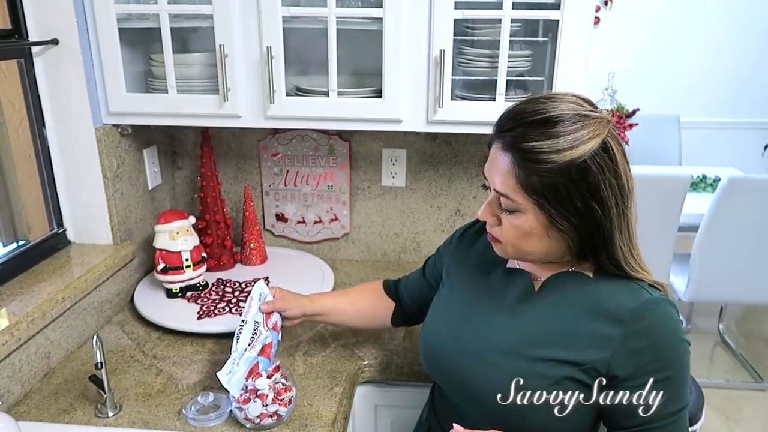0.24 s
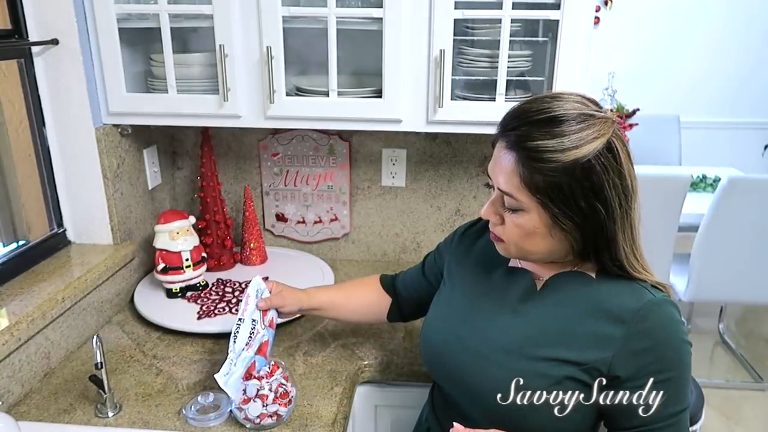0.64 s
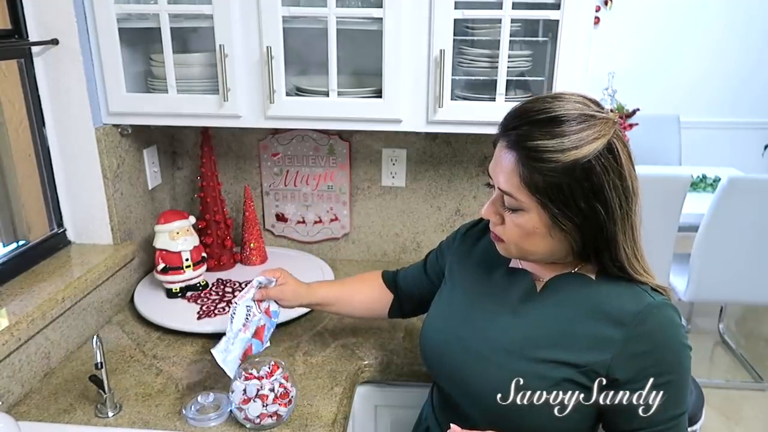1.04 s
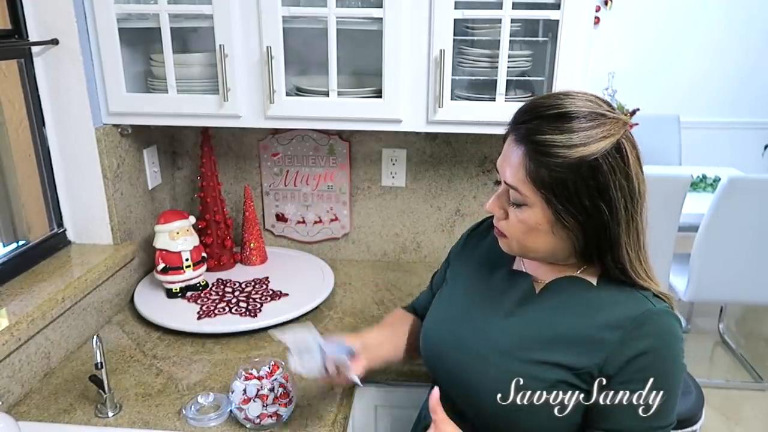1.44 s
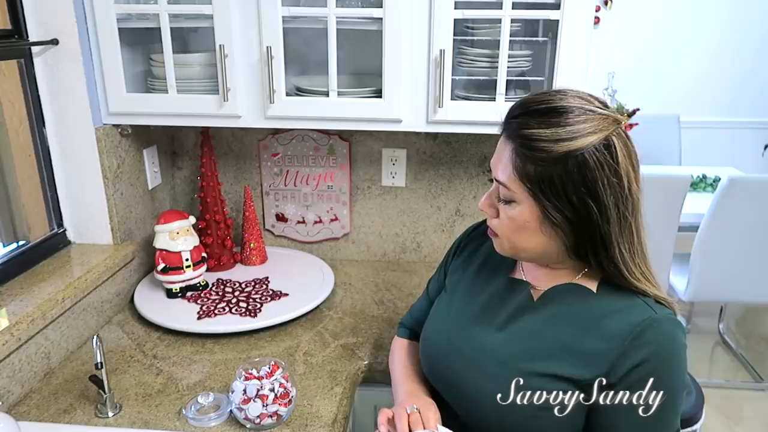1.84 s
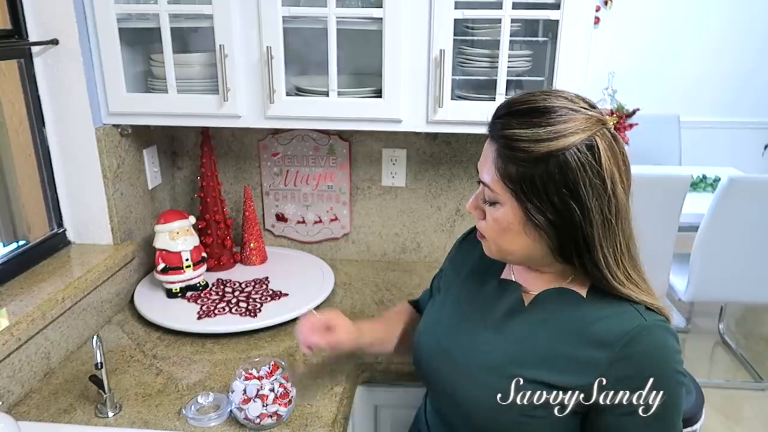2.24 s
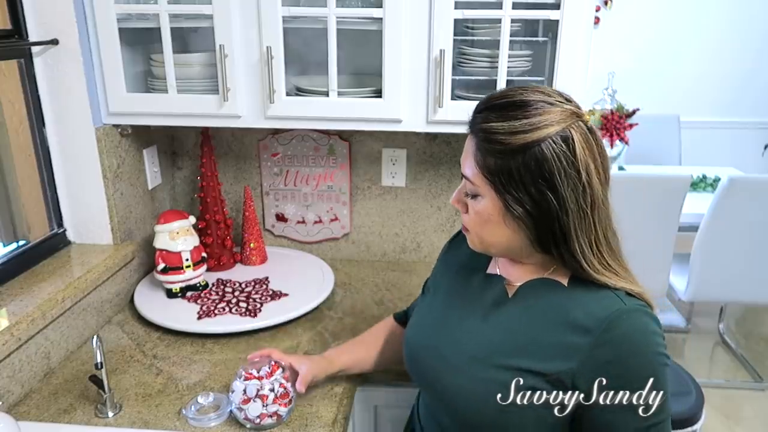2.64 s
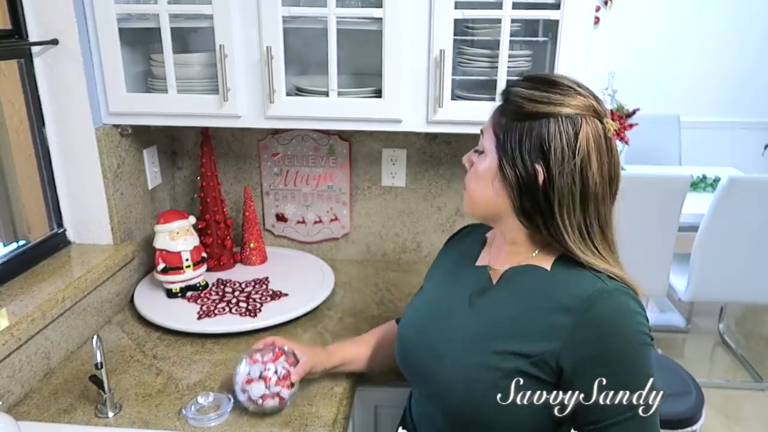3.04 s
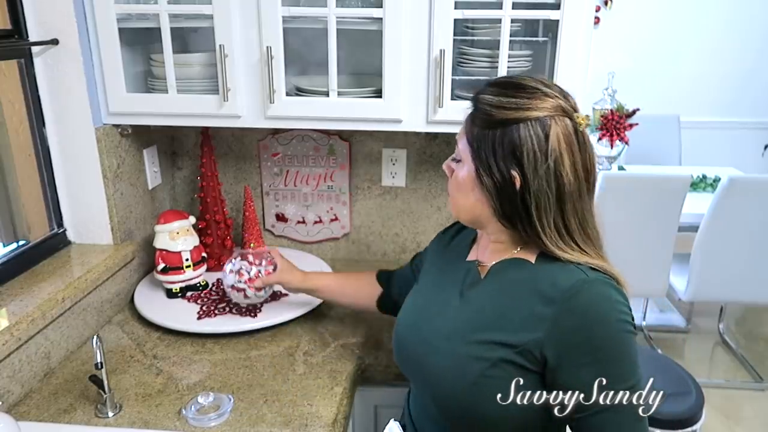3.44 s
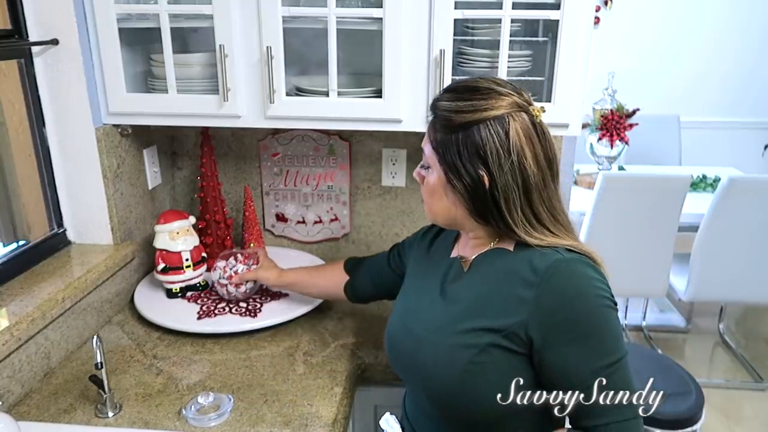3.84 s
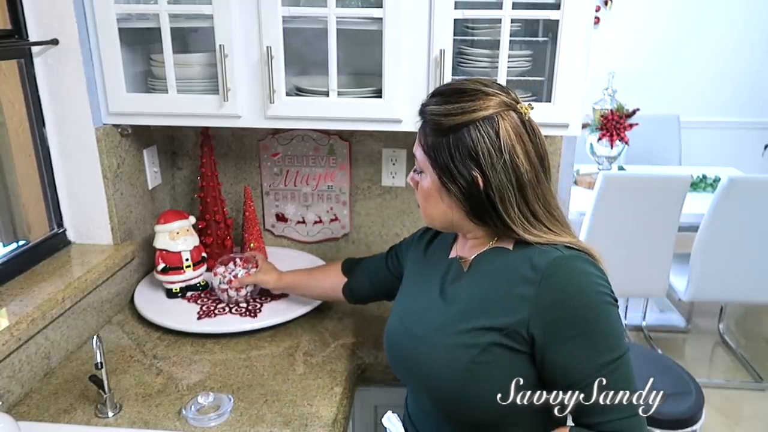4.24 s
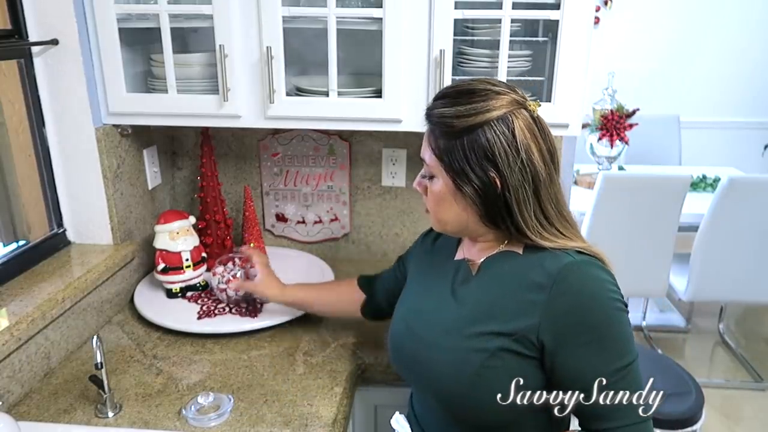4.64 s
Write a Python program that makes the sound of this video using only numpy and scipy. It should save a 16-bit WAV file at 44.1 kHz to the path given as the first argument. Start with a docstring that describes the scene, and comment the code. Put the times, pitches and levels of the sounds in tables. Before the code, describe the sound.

Foil-wrapped sweets slide out of a crackling plastic bag and drop into a glass jar, which rings with a few short clinks. The empty bag is crumpled in a louder, crisp burst. After some light taps and a faint rustle, the jar is set on a tray with a dull thump. An appliance hums softly in the kitchen, and the handling sounds close, in wide stereo.

```python
"""Sweets poured into a glass jar

Foil-wrapped sweets slide from a plastic bag into a jar on a stone kitchen counter. Creases crackle
and the struck glass rings. The empty bag is crumpled, then the jar is lifted and set on a tray,
which thumps. An appliance hums in the room; a small stereo microphone widens the treble."""
import sys
import numpy as np
from scipy import signal
from scipy.fft import rfft, irfft, next_fast_len
from scipy.io import wavfile
from scipy.ndimage import uniform_filter1d

SR = 44100
rng = np.random.default_rng(int(sys.argv[2]) if len(sys.argv) > 2 else 0)


def put_to_file(sound):
    """Save the sound as 16-bit audio at rate SR, in the file named by the first command-line argument."""
    columns = np.atleast_2d(sound).T  # one column per channel
    safe = np.clip(columns, -1, 1)
    whole_steps = np.round(safe * 32767)
    wavfile.write(sys.argv[1], SR, whole_steps.astype(np.int16))


N = 211239


def crackle(snaps_per_s=9000, spread_db=2.5, clump_db=0.5, patch_db=4.0):
    """Tiny creases snap in clumps; brisk handling brings out fizz, sliding sweets a dull body."""
    # The crackle's tone. Each row: frequency in Hz, level in dB.
    tone = [(180, -10), (300, -3), (600, 2), (1180, 5), (1970, 6), (2170, 3.5), (2790, 2.5), (8700, -12.5),
            (11300, -12.5), (13600, -15.5), (15500, -70)]
    # Spells of handling the bag and jar. Each row: start and hold in seconds, relative level in dB,
    # then fizz and body in dB above that level.
    spells = [(0, 0.019, -33.5, -10.5, 1.5), (0.134, 0.045, -45.5, -3.5, 6),
              (0.261, 0.07, -43.5, -2.5, 2.5), (0.378, 0.27, -53, -7.5, 2), (0.583, 0.25, -53.5, -6, 4.5),
              (0.892, .03, -66, 2, 17), (0.981, 0.027, -31.5, -11.5, -2), (1.083, 0.01, -47, 9.5, -16),
              (1.153, 0.21, -50, -13, 3.5), (1.369, 0.32, -48.5, -4, -2.5), (1.73, 0.13, -36, -5, -0.5),
              (1.881, 0.098, -37, 2.5, -2), (2.006, 0.11, -36.5, -3.5, -3.5),
              (2.154, 0.068, -36.5, 3.5, -3.5), (2.284, 0.064, -38.5, 2.5, -6),
              (2.387, 0.088, -39.5, 0, -4.5), (2.674, 0.24, -52.5, -8.5, 2.5), (2.947, 0.034, -48, 5, 1),
              (3.033, 0.062, -41.5, -7.5, -3.5), (3.23, 0.76, -63.5, -1.5, -9), (3.838, 0.04, -61, -5, 1),
              (4.18, 0.029, -55.5, -23, 15), (4.58, 0.026, -60, -6.5, 3)]
    t = np.arange(N) / SR
    size_db = spread_db * np.minimum(rng.exponential(1, N), 3.5)
    size_db += clump_db * np.clip(wander(90), -2, 1.1)
    clicks = gain_of(size_db) * rng.choice([-1., 1.], N) * (rng.random(N) < snaps_per_s / SR)
    bands = signal.stft(coloured(clicks, tone), nperseg=256)[2]
    # Panels of film of changing size ring briefly, so patches of tone come and go.
    patches = uniform_filter1d(rng.standard_normal(bands.shape), size=4, axis=0)
    patches = uniform_filter1d(patches, size=6, axis=1)
    film = signal.istft(bands * gain_of(patch_db * evened(patches)), nperseg=256)[1][:N]
    body = coloured(film, [(700, 4), (1300, -25.5)])
    fizz = coloured(film, [(3300, -34.5), (5500, 0)])
    middle, fizz, body = evened(film - body - fizz), evened(fizz), evened(body)
    return sum(spell(t, start, hold, db) * (middle + gain_of(fizz_db) * fizz + gain_of(body_db) * body)
               for start, hold, db, fizz_db, body_db in spells)


def spell(t, start, hold, db, swell_db_per_s=416, fade_db_per_s=169):
    """The loudness of one rustle: it swells quickly, holds, then fades."""
    before, after = np.maximum(start - t, 0), np.maximum(t - start - hold, 0)
    return gain_of(db - swell_db_per_s * before - fade_db_per_s * after)


def knocks(fade_s=0.076):
    """Creases give way and sweets knock and slide: each is a noise burst with a broad pitch."""
    # Each row: start in seconds, relative level in dB, pitch in Hz, brightness in dB, rise in seconds.
    hits = [(0.0946, -19.5, 1290, -28, 0.0023), (0.172, -22.5, 1430, -25, 0.0026),
            (0.2679, -11.5, 1420, -3, 0.0023), (0.3083, -20, 895, -31, 0.0031),
            (0.368, -9.5, 1090, -41, 0.0015), (0.5759, -8.5, 3950, -18.5, 0.001),
            (0.67, -13.5, 1030, -24.5, 0.00093), (0.8792, -19.5, 2380, -2, 0.00046),
            (0.8977, -19.5, 1450, 10, 0.0013), (0.9345, -17, 1500, -35, 0.0015),
            (0.948, -17, 1500, -32, .003), (0.963, -5.5, 1600, -4, 0.00083),
            (0.974, -13, 1510, -16, 0.0024), (0.9849, -11, 1450, -7, 0.0027),
            (1.005, -8.5, 1530, 8, 0.0081), (1.0408, -15, 1890, 5, 0.0025), (1.079, -20, 3970, 26, .012),
            (1.098, -11, 2240, 13, 0.0014), (1.217, -17, 2050, 0, 0.0094),
            (1.329, -19.5, 1770, -17, 0.0057), (1.4195, -22.5, 1310, -13, 0.0021),
            (1.4529, -20.5, 2250, -12, 0.0013), (1.5526, -9, 2700, 9, 0.0013),
            (1.6146, -24, 1100, -10, 0.0026), (1.672, -15, 2500, -8, 0.0012),
            (1.739, -12, 2530, -2, 0.0036), (1.772, -18.5, 1600, -1, .006), (1.795, -7, 1950, -3, 0.0086),
            (1.805, -22, 11000, -4, 0.0016), (1.8228, -9, 1780, 14, 0.0014), (1.856, -11, 12000, 6, 0.0017),
            (1.88, -8.5, 2530, 5, 0.01), (1.9044, -6, 2720, 13, 0.0011), (1.92, -6, 2090, -3, 0.0027),
            (1.951, -6.5, 2450, 3, 0.0051), (2.008, -13, 3940, 4, 0.0067), (2.04, -11, 2520, 18, 0.0041),
            (2.0748, -13, 2540, -3, 0.0041), (2.096, -9.5, 2980, -5, 0.0028),
            (2.127, -10.5, 3660, 3, 0.0016), (2.125, -8.5, 11200, 17, 0.0026),
            (2.155, -15, 2300, -3, 0.011), (2.175, -7.5, 2300, -2, 0.0078), (2.201, -6, 1530, 19, 0.004),
            (2.25, -8.5, 2870, 2, 0.0075), (2.3, -12.5, 2620, 8, 0.0024), (2.327, -13, 2600, 4, 0.0054),
            (2.3452, -14.5, 5890, 2, 0.0028), (2.388, -12.5, 2980, 9, 0.0088),
            (2.424, -17, 5140, 2, 0.0041), (2.634, -22, 2800, -8, 0.008), (2.711, -20.5, 1760, 15, 0.00082),
            (2.7934, -20, 2300, -18, 0.0013), (2.8364, -24.5, 2000, -19, 0.0014),
            (2.9414, -14, 7100, 13, 0.00088), (2.988, -22.5, 2960, 0, 0.0038), (3.0237, -22, 1110, 2, .002),
            (3.027, -20, 12000, 10, 0.0018), (3.044, -16.5, 3620, 3, 0.0029),
            (3.052, -15.5, 1840, -18, .002), (3.0896, -19, 1310, -6, 0.0055), (3.489, -40, 6000, 11, .002),
            (3.5494, -51, 6000, 8, .002), (3.67, -31, 3600, 2, 0.0018), (3.7742, -22, 1560, -7, 0.0011),
            (3.797, -30, 1530, -10, 0.0052), (3.814, -33, 1410, -25, 0.0046),
            (3.858, -22.5, 3180, 5, 0.0035), (3.885, -42, 3200, 0, .008), (4.1582, -28, 2450, -18, 0.00091),
            (4.1828, -16.5, 3360, -23.5, 0.00057), (4.214, -23.5, 1630, -35, .003),
            (4.462, -39, 1040, -17, .001), (4.554, -28, 1830, -17, .001), (4.567, -25.5, 1200, -30, 0.0018),
            (4.626, -22, 1420, -25, 0.0061)]
    out, t = np.zeros(N), np.arange(6000) / SR
    bursts = rng.standard_normal((len(hits), len(t)))
    for (start, db, hz, bright_db, rise), burst in zip(hits, bursts):
        tone = [(120, -5.5), (350, -5), (800, -11.5), (1100, -0.94), (2000, 1),
                (3500, 0.81 * bright_db + 7.5), (6000, bright_db + 1.5),
                (12000, bright_db - 6), (15500, bright_db - 5.5)]
        shape = gain_of(-60 * t / fade_s) * (1 - np.exp(-t / rise)) ** 2
        blow = coloured(np.pad(shape * burst, (200, 0)), tone)
        decay = np.exp(-np.pi * .3 * hz / SR)  # the struck piece rings very briefly
        ring = signal.lfilter([1 - decay], [1, -2 * decay * np.cos(2 * np.pi * hz / SR), decay**2], blow)
        sound = evened(blow) + 0.81 * evened(ring)
        loudest = np.sqrt(uniform_filter1d(sound ** 2, size=400).max())
        add(out, start - 200 / SR, gain_of(db) * sound / (4 * loudest))
    return out


def sharp_clicks(decay_s=0.00037):
    """Creases, sweets striking the glass and the jar touching down click: each is a very short tone."""
    # Each row: start in seconds, relative level in dB, pitch in Hz.
    clicks = [(.2805, -17, 2510), (0.576, -14, 2000), (0.9642, -15, 3000), (.968, -10, 1990),
              (1.5537, -12, 5500), (1.559, -33, 3970), (1.8253, -7, 3900), (1.806, -19, 11000),
              (1.858, -16, 12000), (1.9044, -9, 10200), (2.132, -2, 11100), (2.205, -10, 3000),
              (2.266, -16, 10600), (2.127, -27, 5030), (2.9398, -14.5, 6370), (2.945, -16, 7100),
              (3.0455, -11, 3700), (3.023, -18, 3000), (3.051, -14, 4020), (2.303, -21, 5970),
              (2.348, -13.5, 5940), (2.425, -18, 5100), (2.712, -26, 1800), (2.838, -23, 1500),
              (3.7748, -28, 1600), (4.161, -25, 2400), (4.187, -24, 2800), (4.463, -42, 1200),
              (4.555, -31, 1800)]
    out, t = np.zeros(N), np.arange(200) / SR
    for start, db, hz in clicks:
        add(out, start, gain_of(db) * np.exp(-t / decay_s) * np.sin(2 * np.pi * hz * t))
    return out


def clinks(flutter_db=4.5, flutter_grows_s=0.11):
    """Sweets and a fingernail ring the jar. Hard hits sound brighter; a gripping hand cuts the ring."""
    # Each row: start in seconds, relative level in dB, hardness in dB per octave above 2300 Hz,
    # boost of the jar's low tones in dB, share of the full ring time.
    strikes = [(0.3690, -33.5, -8, 0, 0.56), (.5734, -27, 7.5, -3.5, 0.65), (.670, -50, -11, 14.5, 0.56),
               (0.7036, -51, 12, 9, 0.25), (.742, -46.5, 0.5, -19, 0.96), (.835, -64, 2, -3, 0.38),
               (2.790, -39, 8, -9, 0.22)]
    # The jar's tones; close ones throb together. Each row: pitch in Hz, front and side levels in dB,
    # seconds to fade by 60 dB, front and side starting signs.
    tones = [(860, -4, -8, .25, 1, 1), (894, -2, -8, .3, 1, 1), (912, 1, -2, .1, 1, 1),
             (6465, -31, -31, .3, 1, 1), (9050, -25, -30, .08, 1, 1), (11030, -22, -28, .04, 1, 1),
             (2279, -5.2, -23, .48, 1, 1), (2298.9, 7, 1, .39, 1, 1), (2303.2, 10.4, -3.2, .11, -1, -1),
             (2304.9, -29, -6.9, 1.41, -1, 1), (2314.6, .4, -3.3, .53, 1, 1),
             (4221.8, -45, -21, .84, -1, -1), (4205, -6.5, -14.4, .58, -1, 1),
             (4193.2, -16, -26.7, .95, 1, -1), (4174.5, -6, -6, .08, -1, 1)]
    out, t = np.zeros((2, N)), np.arange(SR // 2) / SR
    # Loose sweets brush the wall, so each group of nearby tones flutters.
    flutter = {round(hz / 2000): flutter_db * wander(70) for hz, *_ in tones}
    growth = np.minimum(t / flutter_grows_s, 1) ** 2
    for start, db, hardness_db, low_db, share in strikes:
        now = slice(round(start * SR), round(start * SR) + len(t))
        ring = np.zeros((2, len(t)))
        for hz, front_db, side_db, fade_s, *signs in tones:
            strike_db = hardness_db * max(np.log2(hz / 2300), 0) + low_db * (hz < 1000)
            ring_db = growth * flutter[round(hz / 2000)][now] - 60 * t / (share * fade_s)
            wave = gain_of(strike_db + ring_db) * np.sin(2 * np.pi * hz * t)
            ring += np.outer(gain_of([front_db, side_db]) * signs, wave)
        for mix, sound in zip(out, ring):
            add(mix, start, gain_of(db) * sound * (1 - np.exp(-t / 0.001)))
    return out


def taps():
    """Sweets, knuckles and the jar's foot make dull taps that do not ring the glass."""
    # Each row: start in seconds, relative level in dB, pitch in Hz, seconds to fade by 60 dB.
    thuds = [(0.279, -24.5, 253, 0.039), (.34, -28.5, 490, 0.048), (.965, -25, 265, 0.1),
             (.99, -28, 540, 0.088), (1.92, -28.5, 399, .08), (2.074, -29, 232.6, 0.19),
             (2.074, -21, 573, 0.04), (2.194, -19, 602, 0.031), (2.836, -31.5, 672, 0.076),
             (2.852, -19, 770, 0.019), (2.871, -34, 660, 0.029), (3.048, -27, 500, 0.058),
             (4.168, -30, 91, 0.17), (4.179, -30.5, 91.5, .08), (4.212, -34, 96, 0.26),
             (4.192, -27, 385, .04)]
    out, t = np.zeros(N), np.arange(SR // 8) / SR
    attack = 1 - np.exp(-t / 0.00083)
    for start, db, hz, fade_s in thuds:
        add(out, start, gain_of(db - 60 * t / fade_s) * np.sin(2 * np.pi * hz * t) * attack)
    return out


def tray_thumps():
    """The jar lands and rocks; the tray answers each touch with a dull thump."""
    # Each row: start in seconds, relative level in dB.
    touches = [(4.156, -36), (4.171, -38), (4.184, -34), (4.2, -36), (4.214, -59)]
    # The tray's tones. Each row: pitch in Hz, relative level in dB, seconds to fade by 60 dB.
    tones = [(220, -3, 0.061), (261, 1, 0.12), (393, -3, 0.095), (553, 2, 0.1), (752, 8, 0.033),
             (1120, 0, 0.054), (1497, -1.5, 0.049)]
    out, t = np.zeros(N), np.arange(SR // 4) / SR
    thump = sum(gain_of(db - 60 * t / fade_s) * np.sin(2 * np.pi * hz * t) for hz, db, fade_s in tones)
    for start, db in touches:
        add(out, start, gain_of(db) * thump * (1 - np.exp(-t / 0.00095)))
    return out


def kitchen(sound):
    """The room sends back a few clear echoes, then a wash whose treble dies first (mid and side)."""
    # Each row: frequency in Hz, seconds for the wash to fade by 60 dB.
    fade_times = [(250, 0.51), (1000, 0.49), (4000, 0.49), (12000, 0.26)]
    # Counter, wall and cupboard. Each row: delay in seconds, relative level in dB.
    echoes = [(.004, -14), (.009, -13), (.016, -12)]
    bounces = np.zeros((2, SR // 2))
    arrivals = np.arange(300, SR // 2 - 20, 20)
    arrivals = arrivals + rng.integers(0, 20, (2, len(arrivals)))
    np.put_along_axis(bounces, arrivals, rng.choice([-1., 1.], arrivals.shape), 1)
    hz, t, bands = signal.stft(bounces, SR, nperseg=256)
    fade = gain_of(-60 * t / curve_at(fade_times, hz)[:, None])
    tail = signal.istft(bands * fade, SR, nperseg=256)[1]
    tail /= np.linalg.norm(tail[0])
    tail[0] *= gain_of(-1.5)
    for k, (delay, db) in enumerate(echoes):
        tail[:, round(delay * SR)] += gain_of(db) * np.array([1, (-1) ** k])
    return signal.fftconvolve(sound[None], tail, axes=1)[:, :N]


def room_tone(air_db=-46):
    """Air rushes softly and an appliance motor hums with wavering tones (mid and side)."""
    # The air's tone. Each row: frequency in Hz, relative level in dB.
    air_tone = [(12, -33), (20, -21), (59, 2), (161, -5), (225, -1), (282, -2), (416, -5.5), (465, -5.5),
                (746, -12.5), (5530, -35), (10500, -46), (12800, -49), (13900, -44), (15500, -88)]
    # The motor's tones. Each row: pitch in Hz, level in dB.
    motor = [(59.2, -44.5), (118.5, -56.5), (236.9, -48.5), (296.1, -54.5), (355.3, -54), (414.5, -51.5),
             (504, -56), (592.2, -59)]
    air = coloured(rng.standard_normal((2, N)), air_tone)
    air = gain_of(air_db + 0.64 * wander(4.2)) * evened(air)
    t = np.arange(N) / SR
    hum = sum(gain_of(db + 1.6 * wander(5.9)) * np.sin(2 * np.pi * hz * t + 0.92 * wander(4))
              for hz, db in motor)
    return air + hum * np.array([[1], [.6]])


def gain_of(db):
    """Turns decibels into a multiplier."""
    return 10 ** (np.asarray(db) / 20)


def evened(x):
    """Scales x to an average power of 1."""
    return x / np.sqrt(np.mean(x ** 2) + 1e-20)


def curve_at(points, hz):
    """Reads between (Hz, value) points."""
    frequencies, values = np.transpose(points)
    return np.interp(np.log(hz + 1), np.log(frequencies + 1), values)


def coloured(x, points):
    """Shapes the tone of x along (Hz, dB) points."""
    size = next_fast_len(x.shape[-1])
    gains = gain_of(curve_at(points, np.fft.rfftfreq(size, 1 / SR)))
    return irfft(rfft(x, size) * gains, size)[..., :x.shape[-1]]


def add(mix, start_s, sound):
    """Mixes a sound in at its start time."""
    part = mix[max(round(start_s * SR), 0):][:len(sound)]
    part += sound[:len(part)]


def wander(per_s):
    """A smooth random drift, roughly 1 in size."""
    count = int(N / SR * per_s) + 3
    steps = np.interp(np.arange(N) / N * (count - 2), np.arange(count), rng.standard_normal(count))
    return uniform_filter1d(steps, size=N // count // 2)


def scene():
    """Mixes everything as mid (what left and right share) and side (what sets them apart)."""
    glass, glass_side = clinks()
    near = crackle() + gain_of(-5) * knocks() + sharp_clicks() + taps() + tray_thumps()
    mid, side = gain_of(-9) * kitchen(near) + gain_of([[-20], [-19]]) * kitchen(glass) + room_tone()
    mid = mid + gain_of(-3.5) * near + glass
    side = side + gain_of(-0.5) * glass_side - gain_of(-26) * np.roll(near, 4)  # a little off centre
    return np.array([mid + side, mid - side])


def record(dry):
    """The microphone keeps the bass in the middle, spreads the treble and cuts the very top."""
    # Stereo width. Each row: frequency in Hz, side gain in dB.
    width = [(60, -60), (110, -14), (200, -12.5), (380, -8.5), (700, -6), (1290, 0), (2380, 4.5),
             (4400, 7.5), (8120, 7.5), (15000, 11.5)]
    mid = (dry[0] + dry[1]) / 2
    side = coloured((dry[0] - dry[1]) / 2, width)
    pair = coloured(np.array([mid + side, mid - side]), [(12500, -1.5), (14000, -6.5), (15500, -49)])
    top_cut = signal.firwin(511, 15800, window=("kaiser", 9), fs=SR)
    return signal.oaconvolve(pair, top_cut[None], "same")


dry = scene()
out = record(dry)
put_to_file(out)
```